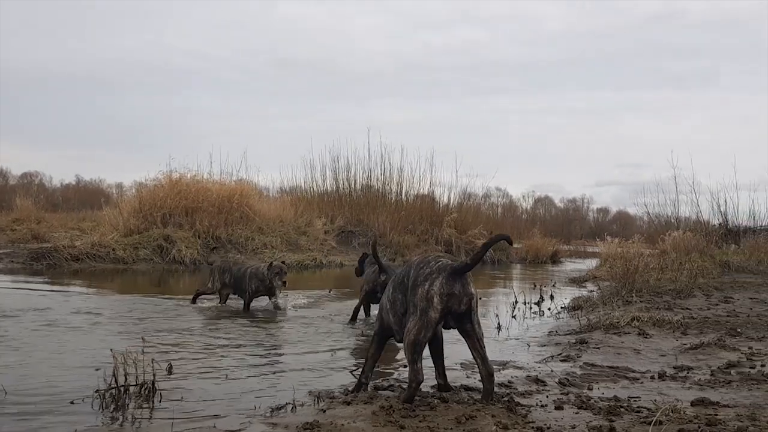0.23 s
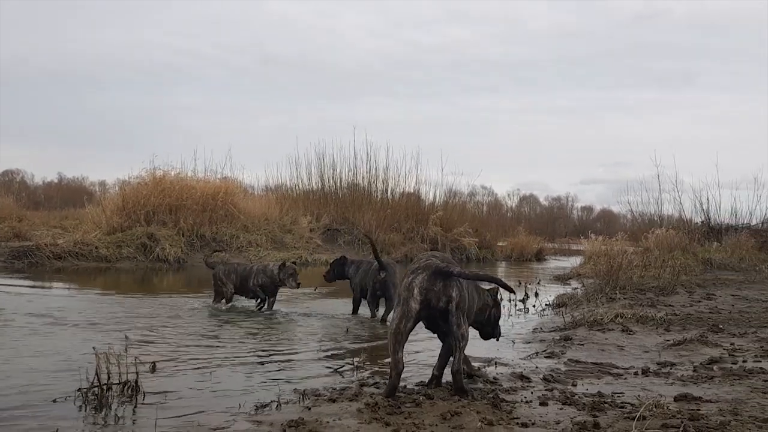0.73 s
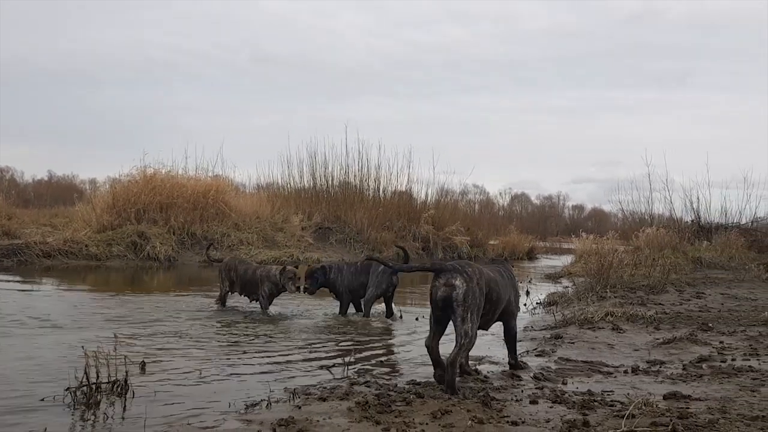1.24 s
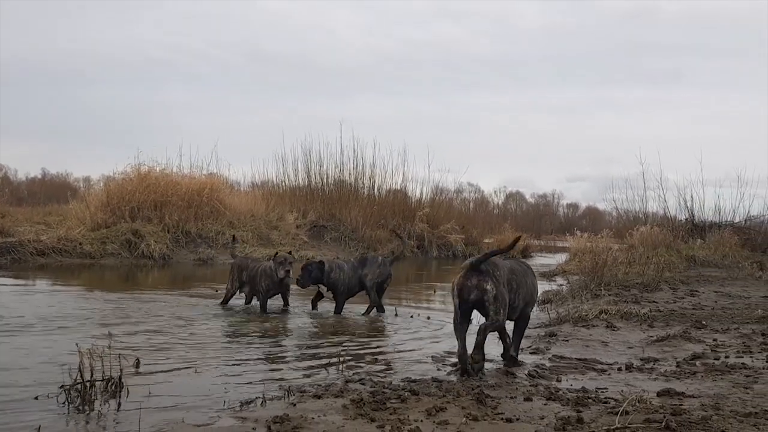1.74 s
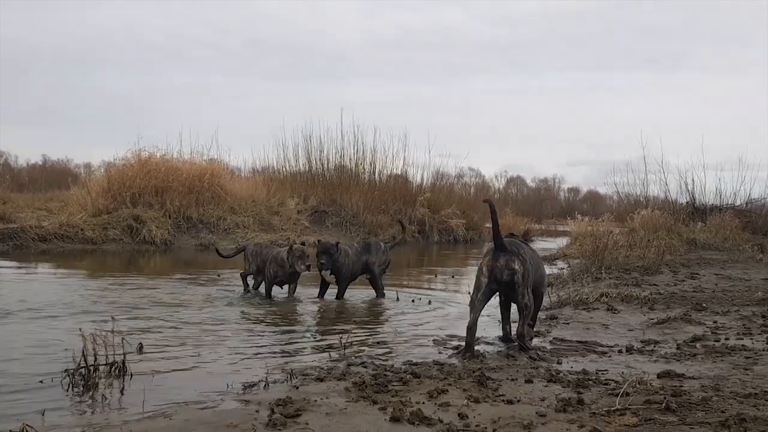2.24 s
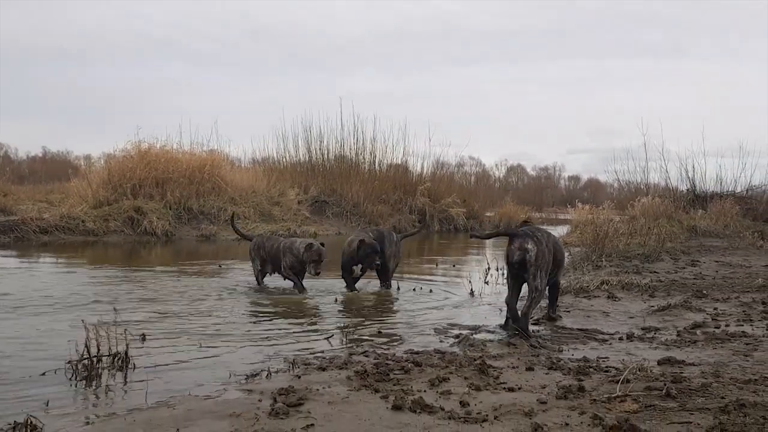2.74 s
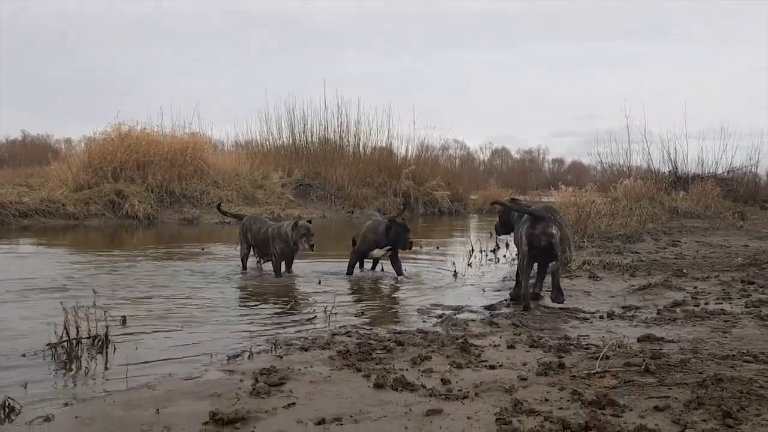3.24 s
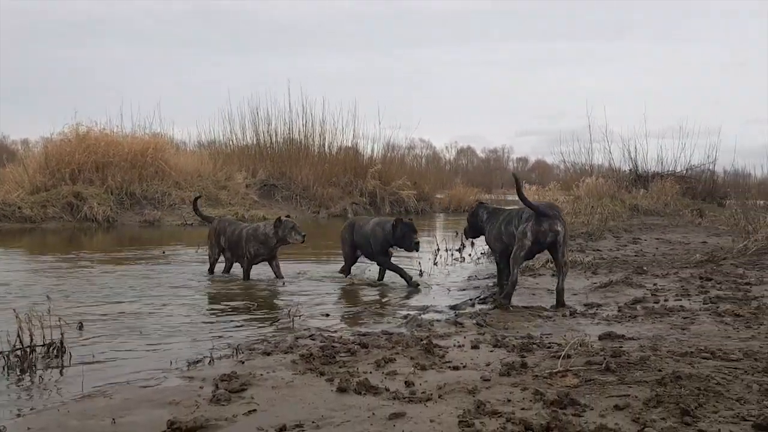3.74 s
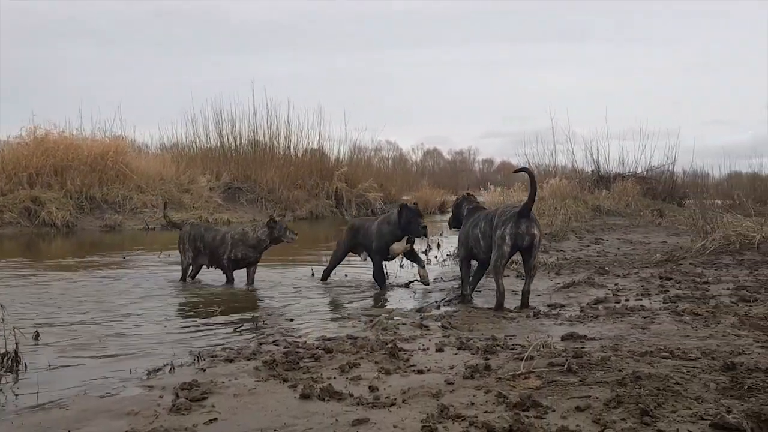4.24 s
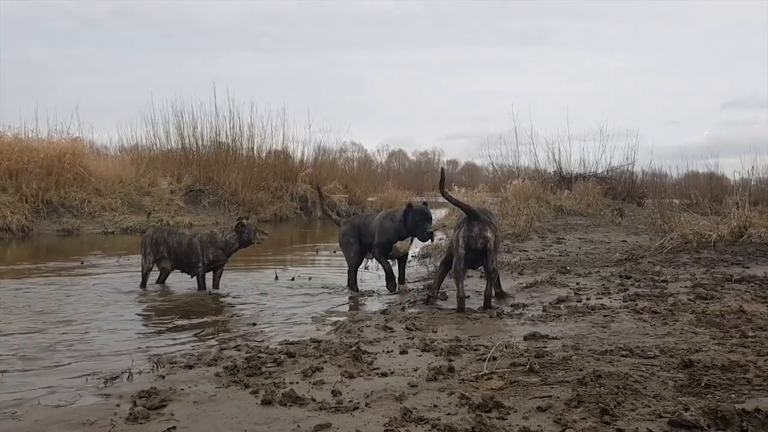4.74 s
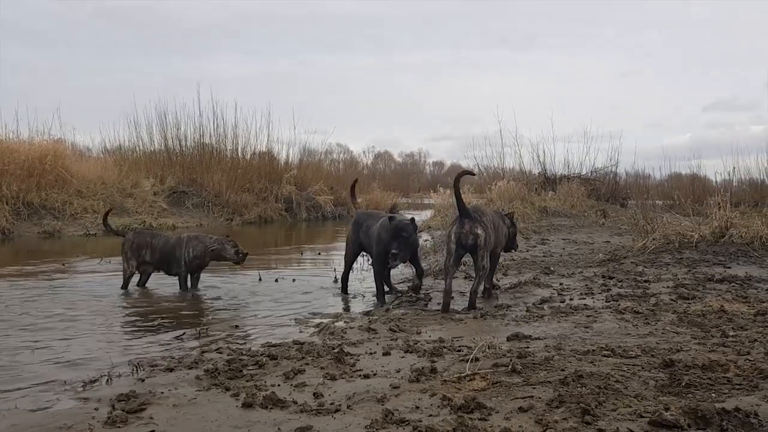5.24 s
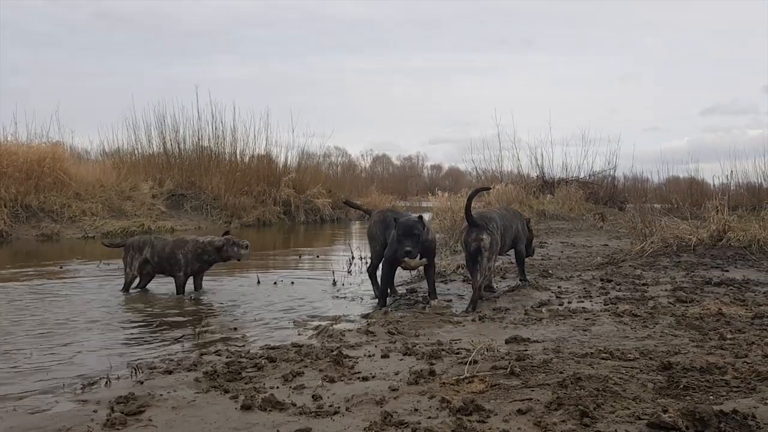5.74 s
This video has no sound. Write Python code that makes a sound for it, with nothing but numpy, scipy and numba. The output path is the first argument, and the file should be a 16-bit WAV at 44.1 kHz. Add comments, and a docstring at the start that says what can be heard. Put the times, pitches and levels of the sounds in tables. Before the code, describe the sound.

Large dogs wade through a shallow river, heard in stereo from a phone held low a few metres away. From 0 to 2 s the water is busy: gurgling bubbles around dragging legs, hollow plops and blips, fizzing spray and crisp smacks, with a dense flurry near 1.3 s. It calms around 2.1 to 2.5 s to small drips. At about 2.7 to 2.9 s sharp plops and splashes return; a bright splash comes at 3.2 s, a rising glug near 3.4 s, the strongest spray at 3.8 s, and more splashes at 4.1, 4.3 and 4.7 s. Near 5 s it is almost still, then scattered short smacks and droplets build from 5.2 s, with crisp hits at 5.7, 5.85 and 5.95 s. Throughout, a breeze rumbles unevenly on the microphone with dull low thuds, notably around 1.6, 3.1, 3.9 and 5.4 s, over faint open-air hiss and very little echo.

```python
"""Large dogs wade through a shallow river, a few metres from a phone held low, in a breeze and faint hiss.
It starts busy: legs drag air under as gurgling bubbles and throw spray, each a swarm of short sine rings.
Around 2.3 s the water calms; then plops, smacks and a few rising glugs join a strong new round of spray.
Near 5 s it calms again before a last burst of smacks, each a handful of droplets.
Throughout, coloured noise makes the breeze rumble on two microphone ports, with dull low thuds."""
import sys
import numpy as np
from scipy import signal
from scipy.fft import rfft, irfft, next_fast_len
from scipy.io import wavfile
from scipy.ndimage import uniform_filter1d
from numba import njit

SR = 44100
rng = np.random.default_rng(int(sys.argv[2]) if len(sys.argv) > 2 else 0)


def transcribe(signal):
    """Save signal, clipped to [-1, 1], as a 16-bit WAV file at the path in sys.argv[1]."""
    frames = np.atleast_2d(signal).T
    limited = np.clip(frames, -1, 1)
    pcm = np.round(limited * 32767).astype(np.int16)
    wavfile.write(sys.argv[1], SR, pcm)


N = 265041  # length of the scene in samples

# how the two microphone ports differ in colour: (pitch [Hz], left minus right [dB])
PORT_COLOUR = [(60, 0.5), (110, 0.0), (200, -2), (380, 1), (700, -0.5), (1290, 2), (2380, 4), (4400, -5.5),
               (8120, -2.5), (15000, 0.5)]
# left leads right by a fixed lag; the direction wanders with the dogs, and grains scatter about it
PORT_LAG_S, PORT_WANDER_S, PORT_SPREAD_S = 3e-5, 6e-5, 3e-5
TOP_HZ = 15900  # the phone lets nothing much above this through
CLUMP_DB = 1.5  # unevenness shared by all bubble sizes
DROP_RISE = 0.02  # share by which a droplet's pitch rises per cycle


def undb(db):
    """Turn dB into a gain."""
    return 10 ** (np.asarray(db) / 20)


def unit(x):
    """Scale to an average strength (rms) of 1."""
    return x / np.sqrt(np.mean(x ** 2))


def curves(table):
    """Draw straight lines between the rows of a time table: one value per sample for each column."""
    s, *columns = np.transpose(table)
    return [np.interp(np.arange(N) / SR, s, c) for c in columns]


def colour_db(spectrum, hz):
    """Read the level of a spectrum table at these frequencies."""
    f, db = np.transpose(spectrum)
    return np.interp(np.log(np.maximum(hz, 1)), np.log(f), db, left=-80)


def noise(spectrum, alike_low, alike_high, turn_hz):
    """Two-channel noise of this colour, rms 1; the share common to both ports changes around turn_hz."""
    size = next_fast_len(N)
    hz = np.arange(size // 2 + 1) * SR / size
    common, opposite = rfft(rng.standard_normal((2, size)))
    high_part = 1 / (1 + (turn_hz / (hz + 1)) ** 4)
    alike = np.clip(alike_low + (alike_high - alike_low) * high_part, 0, 1)
    pair = np.sqrt(1 + alike) * common + np.sqrt(1 - alike) * opposite * np.array([[1], [-1]])
    return unit(irfft(pair * undb(colour_db(spectrum, hz)), size)[:, :N])


def walk(rate):
    """Random levels held for 1 / rate seconds and smoothed twice; spread 1."""
    k = int(SR / rate)
    steps = np.repeat(rng.standard_normal(N // k + 1), k)
    return unit(uniform_filter1d(uniform_filter1d(steps, k), k)[:N])


@njit
def ring(out, start, hz, swell, fade, rise, left, right, turn):
    """Bubbles: sines that swell, fade and rise in pitch; the right port hears each turned in phase."""
    for g in range(len(start)):
        f, phase, size, first = hz[g], 0., 1., int(start[g])
        for i in range(first, out.shape[1]):
            phase += 2 * np.pi * f / SR
            f = min(f * (1 + rise[g] * f / SR), SR / 2.5)
            if i - first < swell[g]:
                now = np.sin(np.pi / 2 * (i - first) / swell[g]) ** 2
            else:
                size *= fade[g]
                now = size
            out[0, i] += left[g] * now * np.sin(phase)
            out[1, i] += right[g] * now * np.sin(phase - turn[g])
            if size < .006:  # too faint to matter
                break
    return out


def bubbles(s, db, hz, swell_s, t60, rise, pan_db, lag_s):
    """Sum of bubbles given in seconds and dB; t60 is the time of a 60 dB fade."""
    given = np.broadcast_arrays(s, db, hz, swell_s, t60, rise, pan_db, lag_s)
    s, db, hz, swell_s, t60, rise, pan_db, lag_s = (1. * v.ravel() for v in given)
    fade = np.exp(-np.log(1000) / (np.maximum(t60, 1e-4) * SR))
    left, right = undb(db + pan_db / 2), undb(db - pan_db / 2)
    return ring(np.zeros((2, N)), s * SR, hz, swell_s * SR, fade, rise, left, right, 2 * np.pi * hz * lag_s)


def open_air():
    """Open country: steady noise with a far rumble below, alike on both ports, and a wide hiss above."""
    # colour of the open air: (pitch [Hz], relative level [dB])
    air_colour = [(35, -40), (60, 0.5), (87, -0.5), (108, 4.5), (156, -4), (363, -24.5), (492, -22.5),
                  (621, -43), (3190, -46), (3500, -28), (4970, -25.5), (9350, -32.5), (16000, -24)]
    return undb(-63) * noise(air_colour, alike_low=1.0, alike_high=0.089, turn_hz=1400)


def breeze():
    """Gusts buffet each port on its own; the upper rumble reaches both much more alike."""
    # strength of the breeze: (time [s], level [dB])
    breeze_levels = [(0.0, -65.5), (0.8, -58), (0.82, -52), (1.24, -61), (1.67, -55.5), (2.01, -58.5),
                     (3.25, -56.5), (3.26, -50.5), (3.41, -65), (3.87, -59), (3.88, -51.5), (4.1, -60.5),
                     (5.24, -66), (5.32, -53), (5.37, -56.5), (6.01, -58)]
    # colour of the gusts: (pitch [Hz], relative level [dB])
    gust_colour = [(12, -43), (20, 1), (65, 11.5), (204, -5.5), (314, -10.5), (350, -20), (460, -40),
                   (770, -120)]
    level_db, = curves(breeze_levels)
    flutter_db = 2.2 * np.array([walk(34), walk(11)])  # left, right
    return undb(level_db + flutter_db) * noise(gust_colour, alike_low=.05, alike_high=0.8, turn_hz=100)


def thuds():
    """Dull pushes of air, likely gusts hitting the phone: low sines that swell over half a cycle."""
    # low thuds: (time [s], peak level [dB], pitch [Hz], left minus right [dB])
    thud_table = [(0.137, -58, 53.8, 0), (0.414, -57.5, 94.2, -1), (0.849, -46, 120, 2),
                  (1.502, -48, 61.9, 19), (1.627, -42.5, 51.1, 22), (1.751, -42.5, 54, 20),
                  (2.29, -49, 61.9, -1), (2.838, -50, 159, -1), (3.05, -43, 71, -18),
                  (3.262, -45.5, 85, -27), (3.882, -41, 72, -22.5), (5.312, -44, 108, -14),
                  (5.385, -47.5, 130, 0), (5.575, -45, 121, 0), (5.749, -50, 64.6, 4)]
    s, db, hz, pan_db = np.transpose(thud_table)
    return bubbles(s, db, hz, .5 / hz, t60=0.064, rise=0., pan_db=pan_db, lag_s=0.00065)


def glugs():
    """Hollows closing behind a lifted paw: large bubbles that swell slowly and slide steeply upward."""
    # glugs: (time [s], peak level [dB], starting pitch [Hz], 60 dB fade time [ms])
    glug_table = [(2.765, -48, 430, 50), (3.374, -36, 289, 140), (4.413, -42.5, 445, 41)]
    s, db, hz, t60_ms = np.transpose(glug_table)
    swell_cycles, rise_per_cycle = 4.1, .028
    return bubbles(s, db, hz, swell_cycles / hz, t60_ms / 1000, rise_per_cycle, 1.8, PORT_LAG_S)


def pockets(count, shed_db, spread_oct, late_s):
    """The plops and blips that one hears singly; each sheds a few smaller bubbles of like pitch."""
    # bubbles and air pockets: (time [s], peak level [dB], starting pitch [Hz], swell [ms], 60 dB fade time [ms])
    pocket_table = [(0.003, -34.5, 493, 0.73, 49), (0.032, -32, 730, 1.8, 22),
                    (0.038, -15.5, 865, 2.14, 9.2), (0.078, -26, 1350, 1.4, 18),
                    (0.105, -39, 1300, 2.4, 43), (0.156, -36.5, 780, 5.8, 31),
                    (0.161, -29.5, 507, 0.73, 12), (0.197, -35, 1820, 1, 23), (0.215, -39, 453, 2.3, 23),
                    (0.253, -36.5, 405, 3.2, 13), (0.255, -46, 1260, .9, 25), (0.278, -39, 536, 9.9, 21),
                    (0.307, -36, 719, .8, 17), (0.339, -34.5, 520, 2.8, 15), (0.339, -31, 1330, 1.6, 10),
                    (0.462, -34.5, 1357, 0.51, 12), (0.548, -43.5, 960, 8.2, 15),
                    (0.593, -39, 900, 0.37, 20), (0.72, -37, 739, 1.5, 42), (0.722, -37.5, 985, 12.6, 13),
                    (0.725, -42.5, 396, 3.2, 53), (0.798, -31.5, 530, 0.69, 31), (0.829, -33, 232, 2.3, 38),
                    (0.831, -28.5, 850, 2.8, 3.2), (0.906, -39.5, 790, 1.15, 44),
                    (0.93, -39.5, 1060, 1.2, 14), (1.063, -38.5, 470, 4.1, 11),
                    (1.136, -35.5, 1190, 11, 9.8), (1.169, -30, 945, .6, 42), (1.213, -46, 497, 6.1, 43),
                    (1.239, -39.5, 1190, .7, 33), (1.282, -39.5, 1072, 9.5, 13),
                    (1.281, -34.5, 608, 12, 18), (1.334, -33, 515, 0.65, 28), (1.334, -30.5, 896, 1.3, 18),
                    (1.338, -40, 279, 1.4, 116), (1.377, -27.5, 935, 0.76, 6.8),
                    (1.481, -38, 4200, 0.87, 20), (1.529, -41, 1050, 4, 22), (1.571, -47.5, 305, 2.7, 30),
                    (1.569, -37.5, 840, 5.6, 18), (1.574, -38.5, 1250, 6.3, 28),
                    (1.613, -38.5, 1160, 3.1, 13), (1.621, -42, 690, 3, 48), (1.703, -39, 2580, 1.5, 23),
                    (1.735, -45, 1056, 2.5, 14), (1.787, -36.2, 2260, 1, 17), (1.843, -32.5, 454, 4, 30),
                    (1.86, -42.5, 634, 30, 42), (1.881, -37, 1020, 0.7, 16), (1.833, -39, 800, 1.6, 40),
                    (1.926, -43.5, 504, 1.5, 61), (1.98, -48, 499, 4.3, 110), (2.052, -42, 1300, 1.3, 16),
                    (2.182, -49.5, 946, 8, 23), (2.2, -48, 2240, 1.9, 17), (2.346, -47.5, 1280, 1.7, 39),
                    (2.453, -44, 820, 3.5, 45), (2.48, -44.5, 377, 1.27, 47), (2.588, -45, 2840, 2.1, 38),
                    (2.615, -48, 954, 2.8, 82), (2.628, -51.5, 558, 4.3, 160), (2.715, -42, 1280, 5.5, 21),
                    (2.799, -35, 1140, 11, 15), (2.83, -34.5, 670, 1.1, 28), (2.836, -24, 490, 2.15, 26),
                    (2.841, -25.5, 1120, 1.2, 61), (2.853, -28, 1156, 1.4, 18), (2.867, -41.5, 190, 1, 140),
                    (2.873, -44, 498, 3, 89), (2.924, -30, 417, 0.67, 7.1), (2.984, -31, 870, 2, 19),
                    (3.002, -39, 1200, 0.84, 31), (3.024, -35.5, 720, 2.5, 12),
                    (3.048, -46.5, 765, 7.7, 120), (3.205, -36.5, 1106, 5.5, 13),
                    (3.264, -37.5, 1104, 0.57, 60), (3.328, -42, 607, 7.7, 67), (3.352, -36, 1130, 1.7, 21),
                    (3.41, -40, 497, 7.8, 30), (3.481, -42, 636, 5.2, 35), (3.658, -36.5, 1055, 8.5, 12),
                    (3.752, -38, 1020, 2.7, 15), (3.787, -27, 970, 1.1, 11), (3.788, -45, 345, 4.4, 66),
                    (3.833, -43, 890, 1.3, 18), (3.942, -41.5, 863, 2.9, 28), (3.944, -36, 1746, 3.5, 43),
                    (4.086, -45, 910, 4.1, 27), (4.115, -43, 1032, 2.3, 35), (4.24, -32.5, 1750, 0.78, 11),
                    (4.351, -40.5, 990, 3.1, 59), (4.454, -46.5, 512, 0.84, 72),
                    (4.676, -43, 1070, 1.3, 28), (4.703, -41, 2120, 3.4, 36), (4.74, -52.5, 1050, 2.8, 25),
                    (4.91, -48, 637, 2.9, 18), (4.912, -49.5, 1064, 1.7, 40), (4.98, -51, 910, 3.3, 21),
                    (4.984, -51.5, 524, 4.1, 25), (5.04, -59, 910, 1.7, 10), (5.262, -34.5, 696, 1.1, 11),
                    (5.262, -35, 910, 1, 8.8), (5.314, -49.5, 705, 1.5, 7.5), (5.36, -40.5, 390, 1.7, 6.3),
                    (5.391, -51, 504, 1.7, 25), (5.41, -51, 487, 2, 22), (5.467, -39.5, 493, 1.7, 14),
                    (5.567, -38, 584, 0.75, 4.9), (5.662, -37.5, 724, 0.9, 22), (5.68, -44, 596, .7, 13),
                    (5.693, -45, 1180, 1, 57), (5.718, -39.5, 1000, 2.5, 25), (5.758, -37, 714, 3.1, 31),
                    (5.85, -33.5, 1030, 1.3, 36), (5.854, -30, 740, 0.54, 18), (5.878, -42, 654, 2.1, 22),
                    (5.941, -27, 964, 1.2, 17), (5.942, -31.5, 683, 2, 9.8), (5.979, -45, 1200, 1.6, 20)]
    s, db, hz, swell_ms, t60_ms = np.transpose(pocket_table)[:, :, None]
    swell_s, t60 = swell_ms / 1000, t60_ms / 1000
    u = rng.random((len(pocket_table), count))
    g = rng.standard_normal((len(pocket_table), 2, count))
    pitch = hz * 2 ** (spread_oct * g[:, 0])
    start = s + u * (swell_s + late_s)
    level_db = db + shed_db + 4.3 * g[:, 1]
    shed = bubbles(start, level_db, pitch, .8 / pitch, 12. / pitch, 0.0086, 2.2, PORT_LAG_S)
    rise = 0.14 / (hz * (swell_s + t60))  # climbs by about this share over the whole ring
    return shed + bubbles(s, db, hz, swell_s, t60, rise, 1.7, PORT_LAG_S)


def smacks(table, count, cycles):
    """Each smack is a handful of droplets around one pitch, crowding at the front and thinning out."""
    s, db, hz, length_ms = np.transpose(table)[:, :, None]
    u, g = rng.random((len(table), 2, count)), rng.standard_normal((len(table), 4, count))
    late = u[:, 0] ** 2
    spread_oct = 0.23 + 0.11 * np.log2(hz / 3000)  # higher smacks are wider in pitch
    pitch = np.clip(hz * 2 ** (spread_oct * g[:, 0]), 1500, TOP_HZ)
    level_db = db - 6.5 - 24 * late + 1.9 * g[:, 1]  # each droplet carries a share of the smack
    lag = PORT_LAG_S + PORT_WANDER_S * g[:, 3, :1] + PORT_SPREAD_S * g[:, 2]
    # droplets land out of step with each other, by up to a cycle
    start = s + late * length_ms / 1000 + u[:, 1] / pitch
    pan_db = colour_db(PORT_COLOUR, pitch)
    return bubbles(start, level_db, pitch, 1.5 / pitch, cycles / pitch, DROP_RISE, pan_db, lag)


def surface_smacks():
    """Paws and drops smacking the surface: short bursts of ringing droplets."""
    # smacks: (time [s], level shared out to the droplets [dB], centre pitch [Hz], spread of the starts [ms])
    smack_table = [(0.0404, -38, 5600, 28), (0.0803, -26, 7700, 8), (0.1298, -37, 2450, 14),
                   (0.448, -35, 3486, 28), (0.4577, -39, 6170, 14), (0.5893, -33.5, 5300, 8),
                   (0.6822, -33, 9800, 28), (0.6805, -40.5, 3034, 8.4), (0.6976, -34, 4570, 8),
                   (0.7203, -34.5, 6000, 8), (0.7846, -31, 3090, 14), (0.7857, -30.5, 6900, 8),
                   (0.8361, -35, 4570, 28), (0.9457, -33, 10568, 17), (1.0495, -30.5, 4291, 17),
                   (1.0514, -34, 10568, 21), (1.1, -35, 4230, 31), (1.224, -33.5, 4700, 8),
                   (1.2914, -25.5, 4300, 8), (1.337, -24.5, 4900, 8), (1.3769, -33, 13944, 8),
                   (1.4801, -28, 4250, 21), (1.5873, -34, 6000, 8), (1.7031, -34.5, 2620, 17),
                   (1.785, -31, 2410, 28), (1.818, -36, 13100, 10), (1.9314, -37, 3170, 8),
                   (2.0, -34.5, 3600, 8), (2.0597, -45, 3470, 14), (2.213, -48.5, 5200, 10),
                   (2.5432, -46.5, 5070, 8), (2.6747, -28.5, 5570, 42), (2.6884, -33.5, 5600, 8),
                   (2.711, -33.5, 4870, 14), (2.7938, -24, 11100, 8), (2.7999, -29, 3090, 8),
                   (2.8375, -30.4, 4600, 8), (2.8603, -34.5, 3850, 17), (2.9249, -38, 2620, 24),
                   (3.122, -34, 4870, 24), (3.2048, -30.5, 2280, 14), (3.209, -22, 5700, 59),
                   (3.4204, -36, 6505, 8), (3.5822, -31.5, 8009, 14), (3.5987, -29, 4700, 8),
                   (3.6607, -33, 8050, 8), (3.6883, -33.5, 4300, 21), (3.7577, -24.5, 5180, 38),
                   (3.7874, -33.5, 4970, 7.3), (3.7986, -31, 11200, 8), (3.8078, -25.5, 8583, 14),
                   (4.1353, -29.5, 5400, 10), (4.2636, -38.3, 7300, 8), (4.308, -31.5, 5700, 119),
                   (4.3236, -28, 11000, 24), (4.374, -36, 4700, 8), (4.628, -29, 6080, 8),
                   (4.672, -33, 3520, 20), (4.674, -27, 7740, 17), (4.709, -29, 4270, 8),
                   (4.8644, -36, 10560, 14), (4.9748, -34.5, 5030, 8), (5.1804, -41, 5150, 8),
                   (5.2226, -32, 7350, 8), (5.263, -34, 5640, 12), (5.282, -43.5, 4000, 10),
                   (5.402, -30.5, 6700, 8), (5.467, -34, 3200, 14), (5.4905, -39, 10500, 9.3),
                   (5.545, -44, 3000, 10), (5.5993, -36.5, 5900, 8), (5.6646, -38, 3740, 14),
                   (5.6783, -21, 9600, 8), (5.701, -37.5, 2460, 14), (5.8481, -31, 6400, 14),
                   (5.8662, -32.5, 3800, 8), (5.9393, -27, 8800, 8), (5.947, -33.5, 2950, 21)]
    return smacks(smack_table, count=28, cycles=20.6)


def drips(spray_db, count, over_db, scatter_db, low_hz, octaves, length_ms):
    """Small smacks at random moments, their level following the spray around them."""
    u = rng.random((count, 4)).T
    db = spray_db[(u[0] * N).astype(int)] + over_db + scatter_db * u[1]
    hz = low_hz * 2 ** (octaves * u[2])
    table = np.transpose([u[0] * N / SR, db, hz, length_ms * (.5 + u[3])])
    return smacks(table, count=20, cycles=24.0)


def swarm(spectrum, count, cycles, rise, scatter_db, clump_db, patch_db, clump_rate, pan_db, tilt_db):
    """Countless small bubbles of all sizes, in clumps, a few louder than the rest; rms 1."""
    u, g = rng.random((count, 4)).T, rng.standard_normal((count, 2)).T
    at = (u[0] * N).astype(int)
    lo, hi = spectrum[1][0], spectrum[-1][0]
    hz = lo * (hi / lo) ** u[1]
    # a grain lasts 1 / hz and pitches thin out as 1 / hz: 6 dB an octave keeps the colour
    db = colour_db(spectrum, hz) + 20 * np.log10(hz)
    db = db + tilt_db[at] * np.log2(hz / np.sqrt(lo * hi))
    db = db + scatter_db * np.minimum(-np.log(1 - u[2]), 5)
    # all sizes come in clumps, and each range of sizes has patches of its own
    patches = np.array([walk(clump_rate) for _ in range(8)])
    size_range = (u[1] * len(patches)).astype(int)
    db = db + clump_db * walk(clump_rate)[at] + patch_db * patches[size_range, at]
    lag = PORT_LAG_S + PORT_WANDER_S * walk(7)[at] + PORT_SPREAD_S * g[0]
    pan = pan_db * g[1] + colour_db(PORT_COLOUR, np.maximum(hz, 300))
    return unit(bubbles(at / SR, db, hz, 1.01 / hz, cycles * (.5 + u[3]) / hz, rise, pan, lag))


def sloshes(table):
    """Level in dB of overlapping sloshes that swell and die away; further columns are mixed by power."""
    s, db, rise_ms, fall_ms = np.transpose(table)[:4, :, None]
    slosh_db = 10  # the level changes this much over each rise or fall time
    t = np.arange(0, N + 64, 64) / SR  # every 64 samples is fine enough
    late_ms = 1000 * (t - s)
    drop_db = slosh_db * np.maximum(-late_ms / rise_ms, late_ms / fall_ms)
    power = undb(2 * (db - drop_db)) + 1e-30
    total = power.sum(axis=0)

    def spread(v):
        return np.interp(np.arange(N) / SR, t, v)

    mixed = [spread(c @ power / total) for c in np.transpose(table)[4:]]
    return spread(10 * np.log10(total)), *mixed


def gurgle():
    """Legs dragging air under: a swarm of larger bubbles that swells and falls."""
    # one gurgle each: (peak time [s], level [dB], time of a 10 dB rise [ms], time of a 10 dB fall [ms])
    gurgle_times = [(0.0, -40, 59, 270), (0.3, -45.5, 270, 125), (0.55, -55, 240, 124),
                    (0.815, -51, 170, 72), (0.915, -48, 68, 67), (1.16, -42.5, 101, 77),
                    (1.309, -41.5, 54, 31), (1.41, -50.5, 120, 48), (1.595, -48, 89, 80),
                    (1.863, -47.5, 160, 76), (2.0, -60, 100, 85), (2.2, -58.5, 35, 56),
                    (2.457, -60, 27, 100), (2.76, -72, 230, 100), (2.837, -42.5, 42, 36),
                    (2.99, -48, 410, 160), (3.338, -46, 196, 210), (3.5, -47.5, 210, 120),
                    (3.66, -53.5, 50, 97), (3.777, -45, 45, 41), (3.946, -49, 16, 92),
                    (4.111, -54.5, 66, 200), (4.37, -55.5, 160, 160), (4.47, -55, 150, 35),
                    (4.7, -65, 310, 77), (4.914, -58, 12, 80), (4.991, -63.5, 63, 39), (5.287, -66, 86, 50),
                    (5.45, -66.5, 150, 400), (5.689, -53, 15, 170), (5.873, -53, 48, 170)]
    # colour of the gurgle: (pitch [Hz], relative level [dB])
    gurgle_colour = [(150, -39), (250, -5.5), (377, -13), (547, -3), (632, 1), (780, 2), (1290, 1.5),
                     (2200, -19), (2860, -4), (4840, -120)]
    level_db, = sloshes(gurgle_times)
    return undb(level_db) * swarm(gurgle_colour, count=20000, cycles=22.3, rise=0.015, scatter_db=3.0,
                                  clump_db=CLUMP_DB, patch_db=2.5, clump_rate=45, pan_db=5.5,
                                  tilt_db=np.zeros(N))


def spray():
    """Legs throwing spray: a fizz of tiny droplets, longer-ringing lone ones and drips."""
    # one splash each: (peak time [s], level [dB], time of a 10 dB rise [ms], time of a 10 dB fall [ms],
    # brightness [dB per octave])
    splash_times = [(0.0, -45, 44, 620, -9), (0.205, -54, 400, 200, 1), (0.477, -45.5, 54, 81, -5.5),
                    (0.69, -50, 20, 150, -5), (0.839, -46, 140, 80, -6.5), (1.04, -52, 210, 130, -7),
                    (1.171, -48.5, 60, 130, -4.5), (1.295, -43, 23, 44, -4), (1.347, -43, 35, 114, -5),
                    (1.584, -51, 140, 67, -5.5), (1.783, -49, 240, 170, -5.5),
                    (1.885, -48.5, 42, 48, -10.5), (2.06, -57.5, 190, 36, -8.5), (2.266, -63, 93, 86, -5.5),
                    (2.537, -55.5, 49, 100, -7.5), (2.68, -47, 37, 180, -7.5), (2.8, -43.5, 15, 20, -2.5),
                    (2.86, -49, 250, 210, -3.5), (2.97, -53.5, 71, 76, -10.5), (3.17, -47, 93, 96, -4),
                    (3.21, -39.5, 32, 40, -4.5), (3.431, -48, 117, 420, -3), (3.598, -44.5, 65, 40, -6),
                    (3.698, -45.5, 49, 30, -8.5), (3.795, -35.5, 37, 26, -2), (3.945, -48, 140, 71, -8.5),
                    (4.128, -41.5, 40, 61, -5.5), (4.314, -41, 64, 58, -2), (4.43, -53.5, 150, 117, -6.5),
                    (4.632, -47, 18, 60, -6.5), (4.678, -43.5, 22, 21, -6), (4.71, -49, 15, 46, -5.5),
                    (4.923, -54, 48, 69, -1), (4.983, -58, 60, 25, -9), (5.15, -62, 34, 190, 1),
                    (5.221, -44.5, 7.2, 13, -3), (5.274, -53, 39, 34, -5), (5.405, -53, 31, 36, 1),
                    (5.479, -54.5, 84, 300, -2.5), (5.687, -53, 36, 70, -3), (5.797, -49.5, 54, 34, -4),
                    (5.858, -41.5, 5.8, 32, -5.5), (5.952, -48.5, 23, 60, -4.5)]
    # colour of the spray: (pitch [Hz], relative level [dB])
    spray_colour = [(880, -33), (1500, -17), (1810, -12), (2040, -6), (2200, -14), (3170, -7.5), (4840, -4),
                    (8170, -9.5), (9190, -10), (11300, -5.5), (15800, -21)]
    level_db, tilt_db = sloshes(splash_times)
    fizz = swarm(spray_colour, count=60000, cycles=20.0, rise=DROP_RISE, scatter_db=1.25,
                 clump_db=CLUMP_DB, patch_db=2.0, clump_rate=40, pan_db=6.0, tilt_db=tilt_db)
    # lone droplets that ring longer stand out of the fizz
    lone = swarm(spray_colour, count=2500, cycles=52.0, rise=0.0039, scatter_db=2.5,
                 clump_db=CLUMP_DB, patch_db=2.0, clump_rate=20, pan_db=3.0, tilt_db=tilt_db)
    drops = drips(level_db, count=90, over_db=0.5, scatter_db=7.5, low_hz=2210.0, octaves=1.8, length_ms=12.)
    pan_db = 1.5 * np.array([[.5], [-.5]])  # a little louder on the left
    return undb(level_db + pan_db) * (fizz + undb(-7.5) * lone) + drops


def surface_bounce(water):
    """The bounce off the water surface cancels part of a band of pitches."""
    centre_hz, width_hz, share = 2070, 560, 0.47
    band = signal.lfilter(*signal.iirpeak(centre_hz, centre_hz / width_hz, fs=SR), water)
    return water - share * band


def bank_scatter(water):
    """Scatter from reeds and banks: a short fading noise echo, wide only in the treble."""
    t60_s, level_db, wide_hz = .06, -17, 1500
    t = np.arange(8192) / SR
    fading = np.exp(-np.log(1000) * t / t60_s) * (t > .003)  # the echo starts after 3 ms
    mid, side = rng.standard_normal((2, 8192)) * fading
    side = signal.sosfilt(signal.butter(2, wide_hz, "highpass", fs=SR, output="sos"), side)
    echo = np.array([mid + side, mid - side]) / np.sqrt(np.sum(mid ** 2))
    return undb(level_db) * signal.fftconvolve(water, echo, axes=1)[:, :N]


def scene():
    """Water sounds with their bounce and scatter, over breeze, thuds and open air."""
    single_bubbles = pockets(count=4, shed_db=-17.0, spread_oct=0.31, late_s=.015)
    water = gurgle() + spray() + single_bubbles + glugs() + surface_smacks()
    water = surface_bounce(water)
    return water + bank_scatter(water) + breeze() + thuds() + open_air()


def record(dry):
    """The phone cuts the top with a steep low-pass filter."""
    return signal.sosfilt(signal.ellip(10, .2, 70, TOP_HZ, fs=SR, output="sos"), dry)


dry = scene()
out = record(dry)
transcribe(out)
```